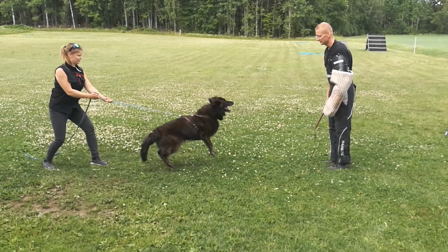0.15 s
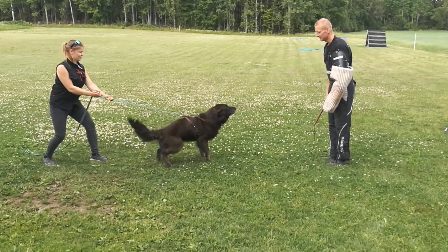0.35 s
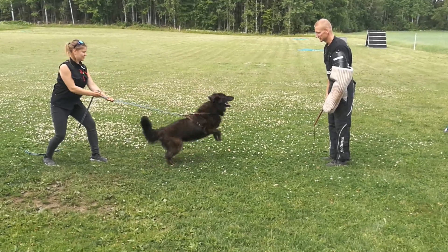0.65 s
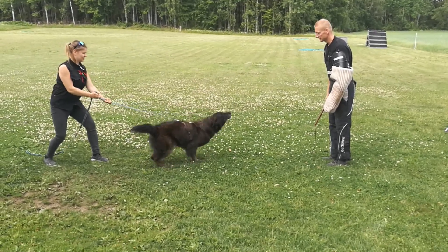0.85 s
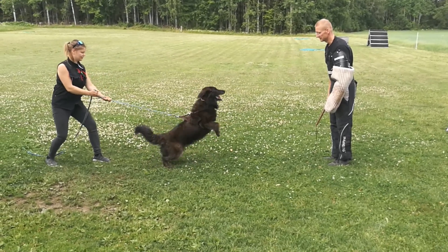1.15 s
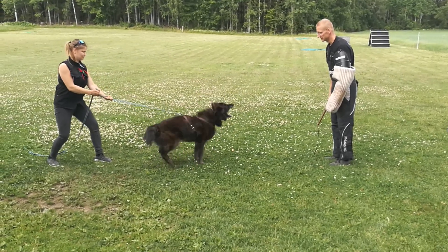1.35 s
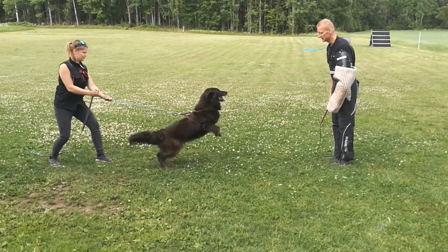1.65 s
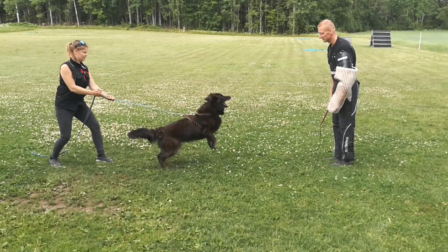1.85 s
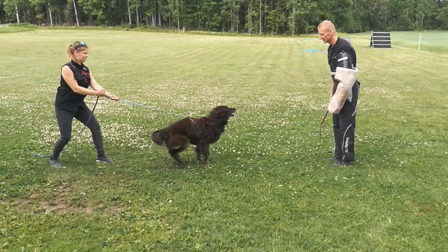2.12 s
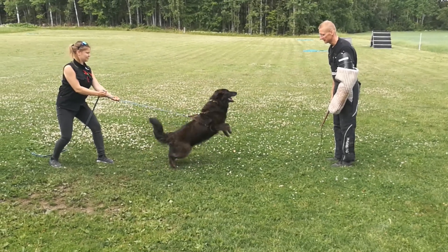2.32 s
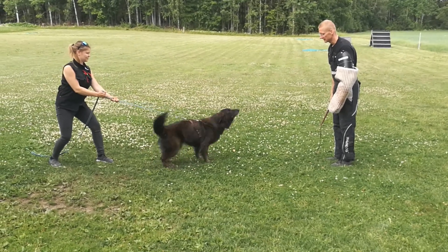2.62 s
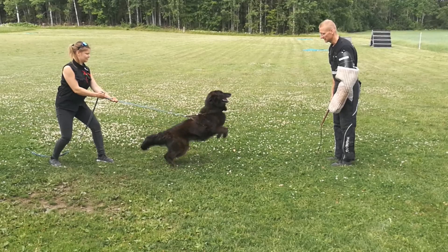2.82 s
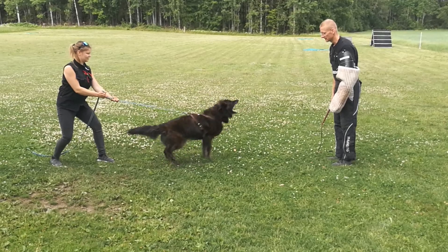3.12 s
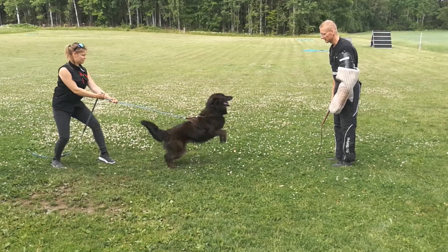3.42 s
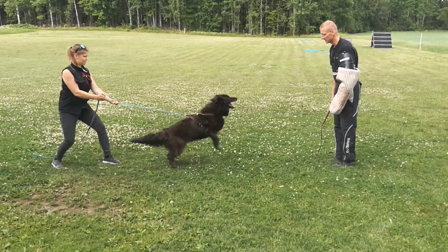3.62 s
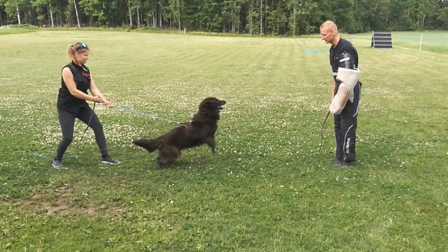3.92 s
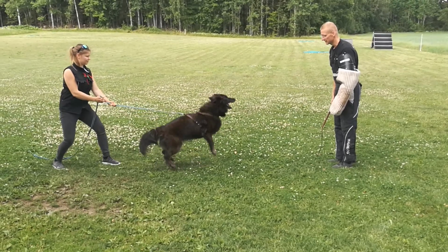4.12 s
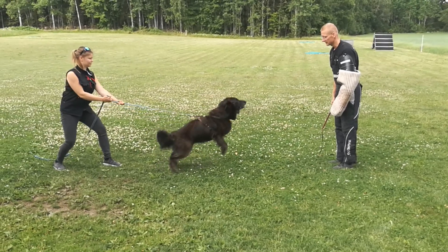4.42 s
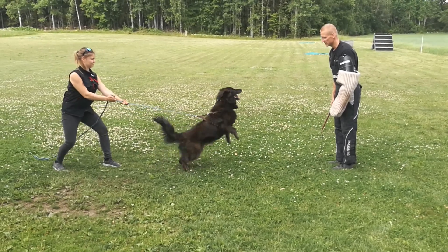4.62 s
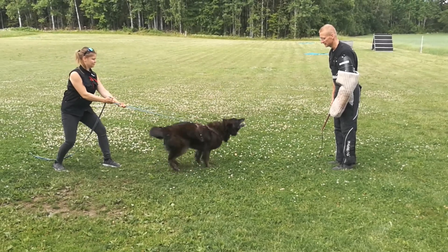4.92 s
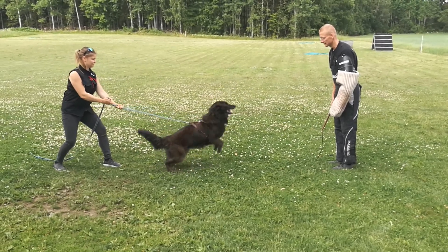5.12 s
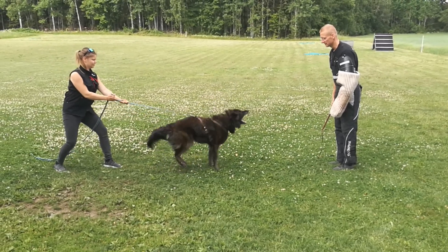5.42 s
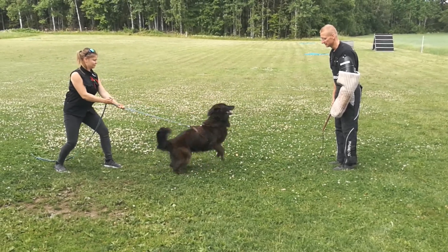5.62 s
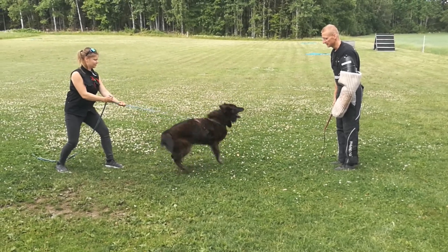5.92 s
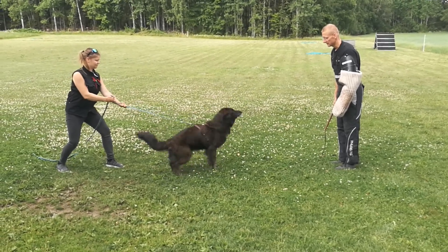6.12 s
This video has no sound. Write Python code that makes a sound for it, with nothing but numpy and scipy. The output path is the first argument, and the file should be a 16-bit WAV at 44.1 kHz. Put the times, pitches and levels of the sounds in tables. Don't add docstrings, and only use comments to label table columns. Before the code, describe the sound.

A large dog barks loudly eleven times at a steady pace on an open grass field, with short gasping breaths and soft paw thuds between.

```python
import sys
import numpy as np
from scipy import signal
from scipy.fft import rfft, irfft, next_fast_len
from scipy.io import wavfile
from scipy.ndimage import uniform_filter1d

SR = 44100
rng = np.random.default_rng(int(sys.argv[2]) if len(sys.argv) > 2 else 0)


def wav_out(sig):
    wavfile.write(sys.argv[1], SR, np.round(np.clip(np.atleast_2d(sig).T, -1, 1) * 32767).astype(np.int16))


def field_ratio(decibels):
    return 10 ** (np.asarray(decibels, dtype=float) / 20)


N = 276066

# (start [s], time to crest [s], crest level [dB], crest pitch [Hz], climb level [dB])
BARKS = [(0.119, 0.12, -12, 638.7, -19.5), (0.702, 0.1, -14.5, 630, -21), (1.277, 0.1, -11.5, 622.8, -17.5),
         (1.839, 0.096, -16, 589.2, -20), (2.416, .124, -10, 651.5, -23), (3.022, .095, -11.5, 632, -19.5),
         (3.602, 0.1, -14, 611, -18.5), (4.162, 0.13, -18, 618.8, -19.5), (4.772, 0.11, -13.5, 630.4, -23),
         (5.326, .111, -11.5, 614.6, -20), (5.897, 0.11, -14.5, 605.7, -18.5)]
# (rush [dB], jaw push [dB], push after crest [s], breath left [dB],
# over at, after start [s])
HUFFS = [(-42.5, -48.5, .069, -58, .345), (-44.5, -47, 0.066, -58, .345), (-42.5, -45, 0.053, -56, .345),
         (-41.5, -43.5, 0.06, -60, .325), (-44, -45.5, .067, -53.5, .345), (-42, -43.5, .079, -56.5, .345),
         (-42, -45.5, .069, -60, .345), (-44, -50, 0.08, -63.5, .33), (-42.5, -40, .06, -56.5, 0.34),
         (-44, -47.5, 0.069, -60, 0.38), (-42.5, -43, .063, -59, .345)]
# (frequency [Hz], width [Hz], level [dB])
AIRWAY_OUT = [(470, 120, -14), (680, 160, -6), (1150, 200, 0), (1650, 260, -2), (2000, 200, -4),
              (2450, 220, -8), (3050, 300, -18)]
# (frequency [Hz], width [Hz], level [dB])
AIRWAY_IN = [(370, 130, -8), (1170, 150, 0), (1680, 240, 0), (2200, 220, -4), (2800, 500, -15),
             (3500, 500, -14), (6200, 1200, -27), (9300, 2500, -33)]
# (time [s], peak level [dB], frequency [Hz])
THUDS = [(0.973, -48, 80.5), (1.541, -52.5, 96.4), (1.664, -52.5, 72.7), (1.829, -51.5, 94.9),
         (2.259, -57.5, 61.93), (2.646, -52.5, 114.3), (3.238, -53.5, 102.9), (3.881, -60, 99.1),
         (6.129, -59, 111.6)]


def evened(x):
    return x / np.sqrt(np.mean(x ** 2) + 1e-20)


def read(points, hz):
    f, value = np.transpose(points)
    return np.interp(np.log(hz + 1), np.log(f + 1), value)


def modes(table, hz):
    power = sum((field_ratio(db) / (1 + (2 * (hz - f) / width) ** 2)) ** 2 for f, width, db in table)
    return np.sqrt(power)


def drift(count, seconds):
    size = max(int(seconds * SR), 1)
    once = uniform_filter1d(rng.standard_normal(count), size)
    return evened(uniform_filter1d(once, size))


def noise(colour, patchy_db):
    hz = np.fft.rfftfreq(512, 1 / SR)
    a, b, patches = rng.standard_normal((N // 128 + 5, 257, 3)).T
    patches = uniform_filter1d(patches, size=3, axis=0)
    patches = evened(uniform_filter1d(patches, size=6, axis=1))
    z = (a + 1j * b) * colour(hz)[:, None] * field_ratio(patchy_db * patches)
    return evened(signal.istft(z, nperseg=512, noverlap=384)[1][:N])


def add(mix, s, sound):
    part = mix[round(s * SR):][:len(sound)]
    part += sound[:len(part)]


def push(hz, turns):
    u = np.arange(2500) / SR * hz
    return np.sin(2 * np.pi * u) * u / turns * np.exp(1 - u / turns)


def hush():
    # (frequency [Hz], density [dB per Hz])
    field = [(120, -28), (200, -1), (288, -21.5), (498, -1.5), (845, -10), (1110, -5.5), (1720, -6),
             (2770, -17), (15600, -36)]
    return field_ratio(-74.5) * noise(lambda hz: field_ratio(read(field, hz)), patchy_db=5.5)


def wind():
    # (frequency [Hz], density [dB per Hz])
    rumble = [(12, -33.5), (20, -2), (72, 2.5), (103, -1), (161, -3.5), (190, -3), (330, -29.5), (430, -48),
              (730, -120)]
    # (time [s], level [dB])
    gusts = [(0.0, -56), (0.05, -76), (0.14, -52), (0.659, -70.5), (1.18, -72.5), (1.67, -58.5),
             (2.16, -74), (2.4, -78), (3.16, -71), (3.4, -79), (3.88, -73), (4.48, -78), (4.511, -74),
             (5.53, -72.5), (5.86, -59), (6.07, -66), (6.26, -72)]
    turf_db, turf_rise_s, turf_fall_s = -1.5, 0.0092, 0.026
    size, t = next_fast_len(N), np.arange(8000) / SR
    hz = np.fft.rfftfreq(size, 1 / SR)

    def rumbling(gain):
        return irfft(rfft(rng.standard_normal(size)) * field_ratio(read(rumble, hz)) * gain, size)[:N]

    shared = rumbling(1)
    apart = rumbling(np.minimum(hz / 150, 1))
    lumps = field_ratio(np.interp(np.arange(N) / SR, *np.transpose(gusts)))
    shake = (1 - np.exp(-t / turf_rise_s)) * np.exp(-t / turf_fall_s)
    for s, db, _ in THUDS:
        add(lumps, s, field_ratio(db + turf_db) * shake)
    pair = evened(shared) + 0.22 * evened(apart) * np.array([[1], [-1]])
    return lumps * field_ratio(3.2 * drift(N, 0.014)) * pair


def trees(x):
    t = np.arange(SR) / SR
    ground = field_ratio(-16.5 - 60 * t / 0.13) * (t > 0.006)
    tree_line = field_ratio(-62 - 60 * abs(t - 0.33) / 0.4) * (t > 0.24)
    sparse = rng.choice([-1., 1.], (2, SR)) * (rng.random((2, SR)) < 2000 / SR)
    taps = sparse * (ground + tree_line) * 0.22
    return signal.fftconvolve(x[None], taps, axes=1)[:, :N]


def flaps():
    # (time [s], peak level [dB], low thump relative level [dB])
    lips = [(0.0198, -58.5, 0), (0.5397, -47.5, -12.5), (0.5828, -48.5, -16), (0.9742, -48.5, -37),
            (1.1173, -45.5, -5.5), (1.6657, -51, -3.5), (1.707, -55.5, 7.5), (1.7502, -56.5, -1.5),
            (2.2234, -50.5, 2.5), (2.8324, -59, -6.5), (2.876, -54, -15.5), (3.425, -48, -30.5),
            (3.476, -65, 5.5), (3.518, -57, -22), (3.9736, -56.5, -18.5), (4.0076, -50, -2.5),
            (4.0475, -49.5, -3.5), (4.09, -57, -11), (4.3524, -48.5, -26), (4.6488, -52, 0),
            (4.6977, -71, 1), (5.165, -47.5, -23.5), (5.215, -56, 1.5), (5.7392, -43.5, -1.5),
            (5.7794, -52, 3.5), (5.8191, -55.5, 4)]
    # (time [s], peak level [dB], frequency [Hz])
    tag = [
        (4.3656, -66, 9000),
        (4.445, -58, 11000),
        (5.1636, -62.5, 9700),
    ]
    out, t = np.zeros(N), np.arange(1500) / SR
    colour = modes(AIRWAY_IN, np.fft.rfftfreq(1500, 1 / SR))
    burst = t / 0.003 * np.exp(1 - t / 0.003)
    for (s, db, thump_db), grit in zip(lips, rng.standard_normal((len(lips), 1500))):
        wet = evened(irfft(rfft(grit) * colour))
        add(out, s - 0.002, field_ratio(db - 4) * wet * burst)
        add(out, s + 0.002, field_ratio(db + thump_db) * push(330, turns=0.4))
    for s, db, hz in THUDS:
        add(out, s, field_ratio(db - 1.5) * push(hz, turns=0.29))
    for start, *_ in BARKS:
        add(out, start + 0.012, field_ratio(-48.5) * push(170, turns=0.22))
    for s, db, hz in tag:
        pair = np.sin(2 * np.pi * hz * t) + 0.7 * np.sin(2 * np.pi * 0.74 * hz * t)
        add(out, s, field_ratio(db) * np.exp(-t / 0.0042) * np.minimum(t / 0.001, 1) * pair)
    return out


def huff(start, crest_s, rush_db, push_db, push_s, left_db, over_s):
    start_db, onset_s, onset_db, rush_lead_s = -83, 0.032, -55, 0.0049
    lull_s, lull_db, push_fall_s, push_fall_db = 0.019, -54, 0.018, -9
    left_s, stop_s, stop_db, end_db = 0.068, 0.037, 9, -82.5
    jaws_s = crest_s + push_s
    s = [0, onset_s, crest_s - rush_lead_s, jaws_s - lull_s, jaws_s, jaws_s + push_fall_s,
         jaws_s + left_s, over_s - stop_s, over_s]
    db = [start_db, onset_db, rush_db, max(lull_db, push_db - 12.0), push_db,
          max(push_db + push_fall_db, left_db), left_db, end_db + stop_db, end_db]
    return start + np.maximum.accumulate(s), db


def breath(folds):
    # (frequency [Hz], width [Hz], level [dB])
    teeth = [(2600, 1800, -9), (3010, 240, 1), (4310, 1300, -3.5), (5160, 710, -4.5), (6045, 2700, -9),
             (9080, 6000, -12.5), (14300, 1300, -21)]
    # (middle [s], half length [s], level [dB])
    gasps = [(.01, 0.062, -64.5), (0.552, 0.11, -62), (1.109, 0.07, -56.5), (1.684, 0.065, -63),
             (2.23, 0.082, -65), (2.837, 0.081, -64.5), (3.432, 0.092, -62.5), (4.029, 0.082, -64),
             (4.637, 0.088, -68), (5.177, 0.08, -61.5), (5.747, 0.096, -60)]
    t, out_db, late = np.arange(N) / SR, np.full(N, -120.), np.zeros(N)
    for (start, crest_s, *_), air_row in zip(BARKS, HUFFS):
        s, db = huff(start, crest_s, *air_row)
        inside = (t >= s[0]) & (t < s[-1])
        out_db[inside] = np.interp(t[inside], s, db)
        late[inside] = np.clip((t[inside] - s[0] - 0.11) / 0.11, 0, 1)
    hiss = noise(lambda hz: modes(teeth, hz), patchy_db=2.2)
    shaded = signal.sosfilt(signal.butter(1, 5000, fs=SR, output="sos"), hiss)
    hiss = (hiss + 0.4 * late * (1.3 * shaded - hiss)) * (1 + 0.35 * folds)
    air = noise(lambda hz: modes(AIRWAY_OUT, hz), patchy_db=5.0)
    air = field_ratio(10.5) * (0.074 + 0.65 * late) * air
    s, half_s, db = np.transpose(gasps)[:, :, None]
    coarse_t = t[::64]
    swell = (field_ratio(db) * np.clip(1 - ((coarse_t - s) / half_s) ** 2, 0, 1)).sum(0)
    gasp = np.interp(t, coarse_t, swell) * noise(lambda hz: modes(AIRWAY_IN, hz), patchy_db=3.5)
    flutter = field_ratio(1.5 * drift(N, 0.006))
    return flutter * (uniform_filter1d(field_ratio(out_db), size=150) * (hiss + air) + gasp)


def sweeps():
    sweep_s, from_hz, to_hz, wander_s, sweep_db = 0.041, 2300, 4020, 0.001, -1.5
    out, hz = np.zeros(N), np.linspace(from_hz, to_hz, round(sweep_s * SR))
    glide = np.sin(2 * np.pi * np.cumsum(hz) / SR) * np.hanning(len(hz))
    for (start, crest_s, *_), (_, push_db, push_s, *_) in zip(BARKS, HUFFS):
        band = drift(len(hz), wander_s) * glide
        add(out, start + crest_s + push_s - 0.6 * sweep_s, field_ratio(push_db + sweep_db) * band)
    return out


def splits():
    # (time [s], length [s], from [Hz], to [Hz], level [dB])
    tones = [
        (1.891, 0.065, 773, 586, -26),
        (4.193, 0.04, 681, 762, -30.5),
        (4.289, 0.022, 2193, 1910, -33.5),
    ]
    out = np.zeros(N)
    for s, length_s, from_hz, to_hz, db in tones:
        hz = np.linspace(from_hz, to_hz, round(length_s * SR))
        tone = np.hanning(len(hz)) * np.sin(2 * np.pi * np.cumsum(hz) / SR)
        add(out, s, field_ratio(db + 4.5) * tone)
    return out


def gesture(start, crest_s, crest_db, crest_hz, climb_db, mouth, pace):
    # (after start [s], voice re climb [dB], share of knee pitch [1], overtone lift [dB], upper lift [dB])
    climb = [(0, -42.5, 0.74, -11, 9.5), (0.013, -29, 0.67, -1, 4.5), (.029, -11.5, 0.99, 4.5, -6.5),
             (0.041, -2.5, 0.97, 6.5, -5)]
    # (after crest [s], voice re crest [dB], share of crest pitch [1], overtone lift [dB], upper lift [dB])
    fall = [(0, 0, 1.0, -13.5, 3.5), (.018, -13, 0.95, -5, 10), (.036, -25.5, .89, 5, -5)]
    # (voice [dB], hoarseness [dB])
    hoarse_by_voice = [(-55.5, 4.5), (-34.5, -0.5), (-24.5, -13), (-14, -20.5)]
    bark_s, spent_db = 0.195, -9.5
    lift_db, upper_db, crest_lift_db, crest_upper_db, hoarse_db = mouth
    onset_db, knee_hz, shoulder_hz, brink, release_db = pace
    up = [(s, climb_db + db + onset_db, knee_hz * share, a, b) for s, db, share, a, b in climb]
    shoulder = (0.068, climb_db, shoulder_hz, 5 + lift_db, 1 + upper_db)
    before = (crest_s - 0.022, crest_db - 3.5, crest_hz * brink, 4.5 + crest_lift_db, 1 + crest_upper_db)
    down = [(crest_s + s, crest_db + db + release_db * (s > 0), crest_hz * share, a, b + crest_upper_db / 2)
            for s, db, share, a, b in fall]
    last = (bark_s, -48.5, 357, -17, 2.5)
    s, voice_db, hz, lift, upper = np.transpose(up + [shoulder, before] + down + [last])
    spent = np.clip((s - crest_s) / (bark_s - crest_s), 0, 1) ** 1.3
    hoarse = np.interp(voice_db, *np.transpose(hoarse_by_voice)) + hoarse_db + spent_db * spent
    return np.transpose([start + np.maximum.accumulate(s), voice_db, hz, lift, upper, hoarse])


def bark(rows):
    # (frequency [Hz], width [Hz], level [dB])
    throat = [(686, 141, 12.5), (1299, 362, 11), (1774, 590, -0.5), (2630, 120, -16.5), (3130, 310, -38),
              (4750, 230, -39), (5900, 1500, -29)]
    s, *columns = np.transpose(rows)
    t = np.arange(s[0], s[-1], 1 / SR)
    voice_db, hz, lift_db, upper_db, hoarse_db = (np.interp(t, s, c) for c in columns)
    shaky = field_ratio(hoarse_db + 19.5)
    waver = 1 + 0.0042 * np.minimum(shaky, 5) * drift(len(t), 0.0025)
    hz = uniform_filter1d(hz, size=400) * waver
    turns, k = np.cumsum(hz) / SR, np.arange(1, 16)[:, None]
    gains = modes(throat, k * hz) * field_ratio(lift_db * (k > 1) + upper_db * (k > 2))
    gains = gains / np.clip(shaky, 1, 4) ** (0.5 * np.sqrt(k - 1))
    tremble = [1.6 * drift(len(t), 0.005) * np.sqrt(np.clip(shaky, 1, 9)) for _ in k]
    flicker = field_ratio(tremble * np.minimum(k, 2) / 2)
    overtones = gains * flicker * np.cos(2 * np.pi * k * turns - 0.8 * k)
    clear = -np.sqrt(2) * overtones.sum(0)
    clear = clear / uniform_filter1d(np.linalg.norm(gains, axis=0), size=1100)
    puffs = (0.4 + np.exp(-(turns % 1) / 0.3)) * rng.standard_normal(len(t))
    f, _, z = signal.stft(puffs, SR, nperseg=256)
    airway = modes(AIRWAY_OUT, f) / (1 + (f / 3300) ** 8)
    hoarse = signal.istft(z * airway[:, None], SR, nperseg=256)[1][:len(t)]
    shimmer = field_ratio(0.5 * np.minimum(shaky, 4) * drift(len(t), 0.009))
    clear = clear * shimmer * np.clip((t[-1] - t) / 0.022, 0, 1)
    sound = field_ratio(voice_db) * (clear + field_ratio(hoarse_db) * evened(hoarse))
    sound = sound * signal.windows.tukey(len(t), 0.12)
    sound = signal.sosfilt(signal.butter(6, 345, "high", fs=SR, output="sos"), sound)
    beat = np.cos(2 * np.pi * turns) / np.maximum(shaky, 1)
    return s[0], sound, beat


def ports(x, other):
    # (frequency [Hz], share [1])
    common = [(60, .97), (300, .9), (1400, .8), (3000, .75), (7000, .75), (15000, .72)]
    # (frequency [Hz], level [dB])
    tilt = [(100, -0.2), (380, 0.8), (700, -3), (1290, -1.5), (2380, -8), (4400, 1), (8600, 9), (12000, -5)]
    # (frequency [Hz], phase [rad])
    lead = [(100, -.45), (850, -.62), (1200, -.5), (2400, -.6), (3000, .43), (4700, .95), (5600, 4.7),
            (7500, 6), (10000, 5.9), (14000, 6.8)]
    size = next_fast_len(N)
    hz = np.fft.rfftfreq(size, 1 / SR)
    same = np.clip(read(common, hz), 0, 1)
    lean = field_ratio(read(tilt, hz) / 2) * np.exp(0.5j * read(lead, hz))
    mid = rfft(x, size) + np.sqrt(same) * rfft(other[0], size)
    side = np.sqrt(1 - same) * rfft(other[1], size)
    return irfft(np.array([(mid + side) * lean, (mid - side) / lean]), size)[:, :N]


def scene():
    # (climb overtones [dB], climb upper ones [dB], crest overtones [dB],
    # crest upper ones [dB], hoarseness [dB])
    mouths = [(4.5, -6, 0.5, -7, 0), (-5.5, 10, -0.5, 6.5, 0), (4.5, -2, -3.5, -0.5, 1.5),
              (8.5, -11, 5.5, -15, 1.5), (-3, -3.5, 2.5, 0.5, -2), (1.5, 0, 5.5, -13.5, 1.5),
              (-1, 2.5, 1, -3, 1), (-4.5, 4, 5, 1, -2), (-6.5, 4, 1, -4, -0.5), (-2.5, 3, 5, -6, -1),
              (2, -0.5, -1, 5, 0.5)]
    # (onset [dB], knee pitch [Hz], shoulder pitch [Hz],
    # share of crest pitch just before it [1], release [dB])
    paces = [(-4.5, 413, 515, 0.94, -3), (-1.5, 436, 572, 0.96, -0.5), (-0.5, 425, 550, .91, -2),
             (-0.5, 443, 532, .92, 1), (1.5, 386, 518, 0.97, -2), (-1, 420, 545, .88, -2),
             (-2.5, 418, 541, .94, 0), (-3, 435, 536, .98, -4), (1.5, 360, 542, .96, 1),
             (-1.5, 425, 545, 0.95, -2.5), (-0.5, 403, 536, 0.96, -2)]
    voice, folds = splits(), np.zeros(N)
    for row, mouth, pace in zip(BARKS, mouths, paces):
        s, sound, beat = bark(gesture(*row, mouth, pace))
        add(voice, s, sound)
        add(folds, s, beat)
    airs = [breath(folds) + hush() for _ in "ab"]
    return ports(voice + flaps() + sweeps(), airs) + trees(voice) + wind()


def roll_off(x):
    return signal.sosfilt(signal.butter(12, 15800, fs=SR, output="sos"), x)


def record(dry):
    return roll_off(dry)


dry = scene()
out = record(dry)
wav_out(out)
```